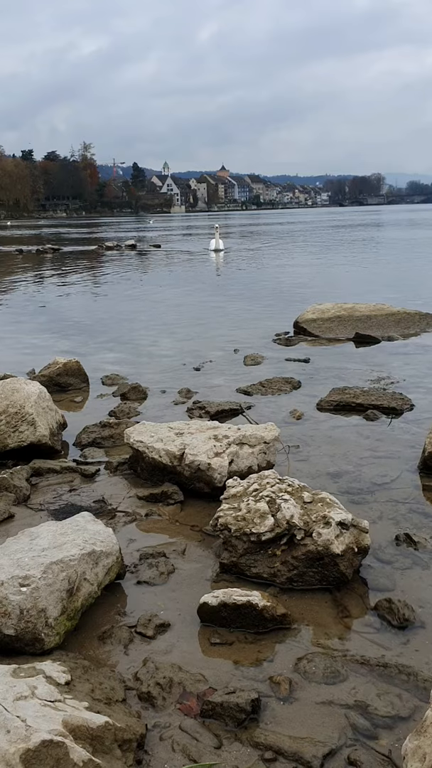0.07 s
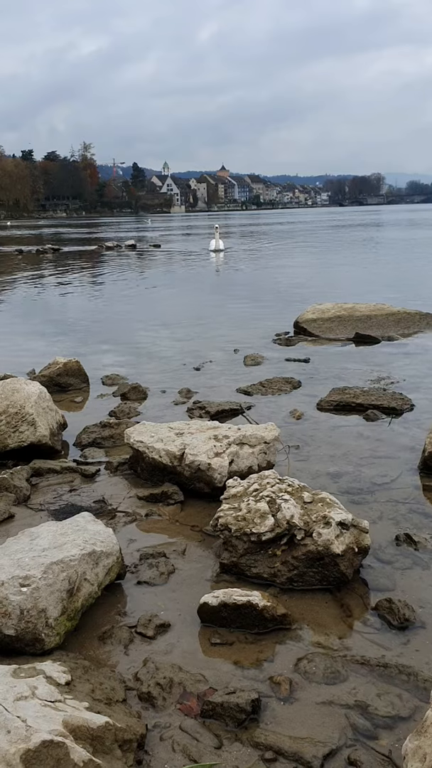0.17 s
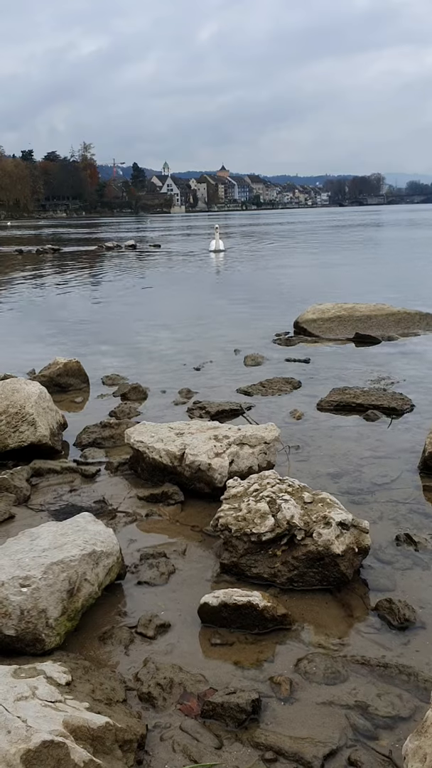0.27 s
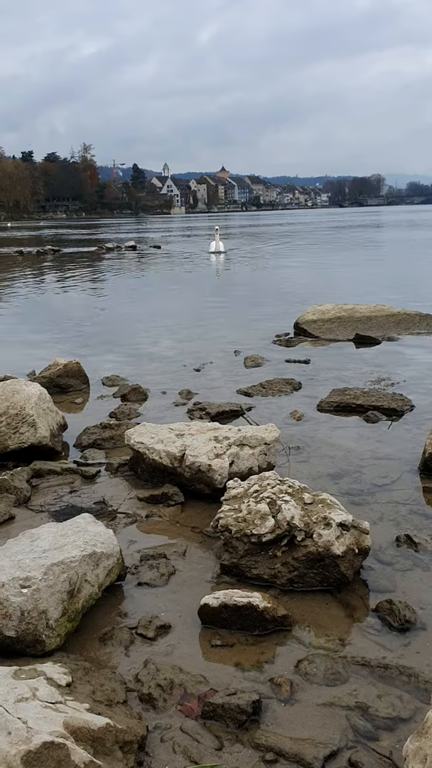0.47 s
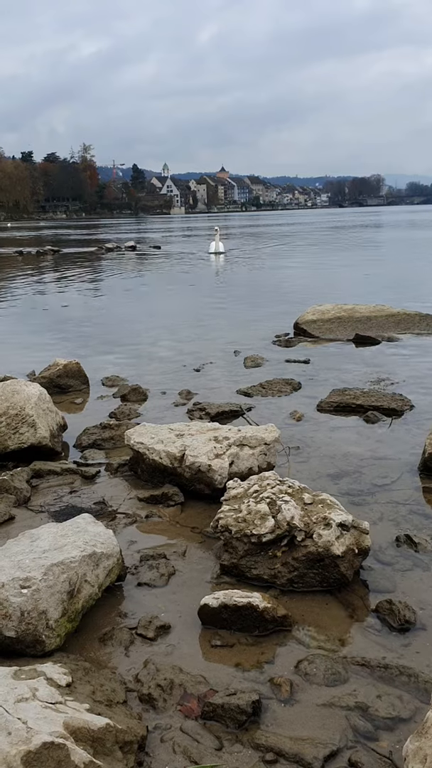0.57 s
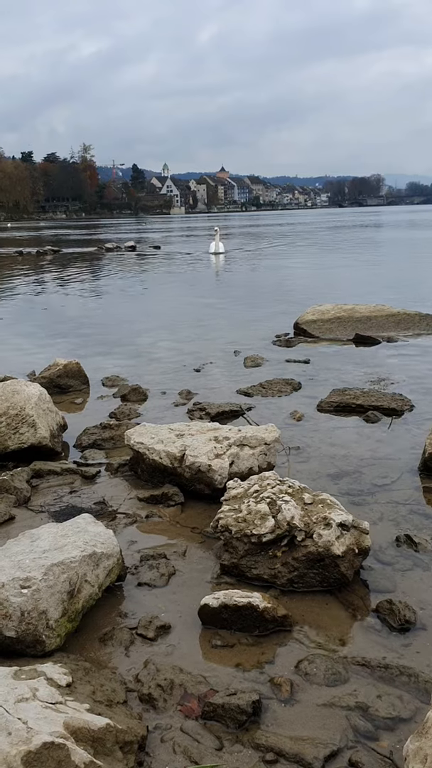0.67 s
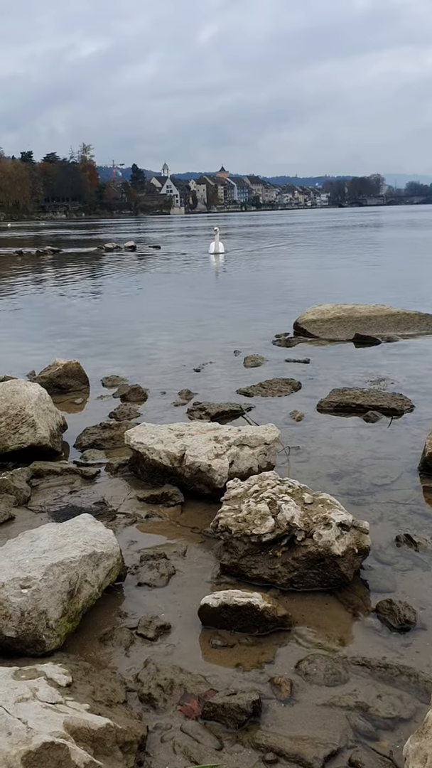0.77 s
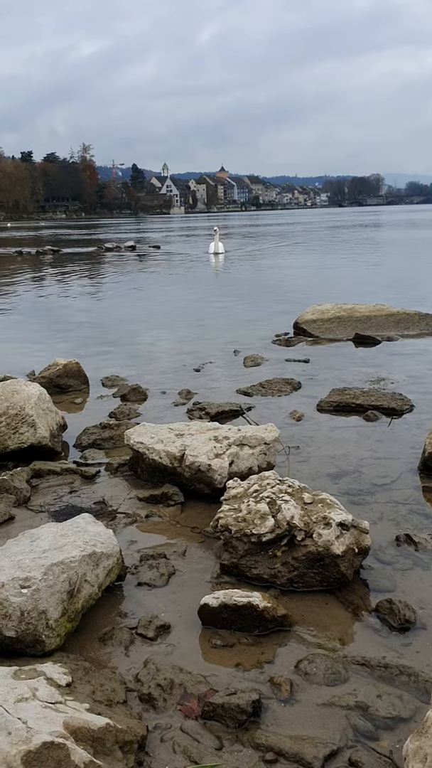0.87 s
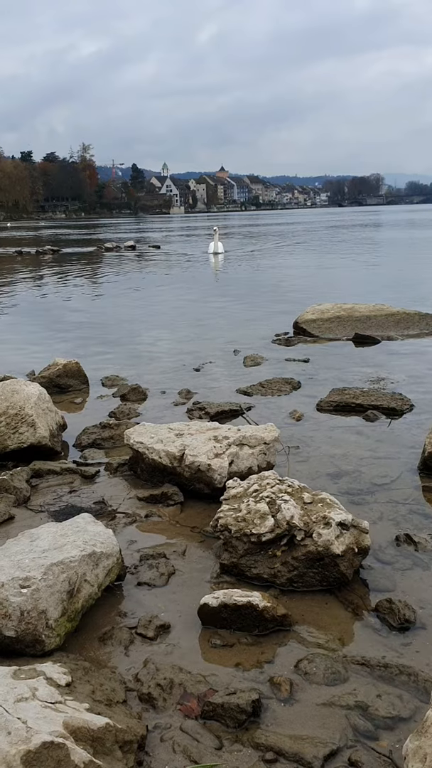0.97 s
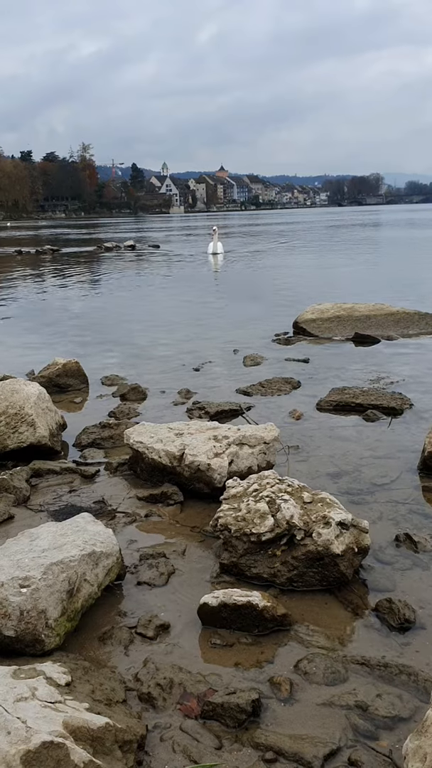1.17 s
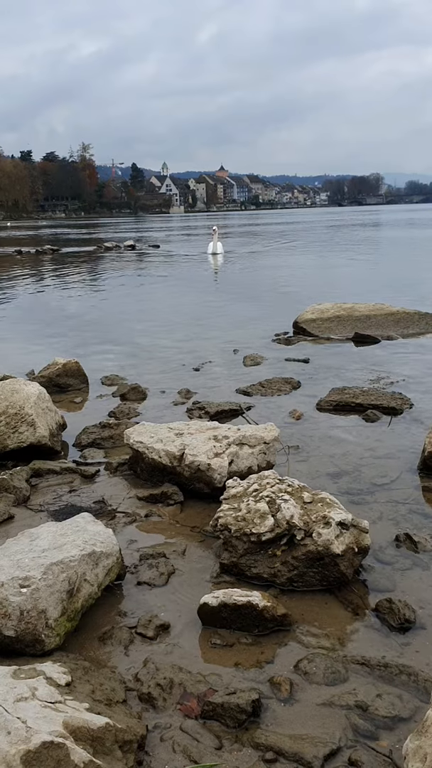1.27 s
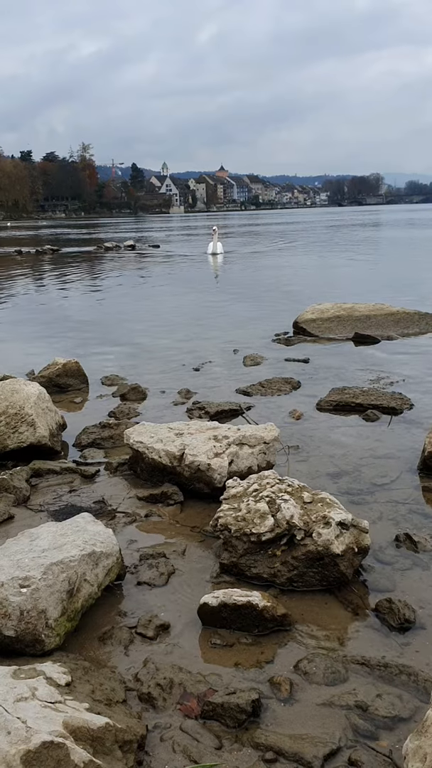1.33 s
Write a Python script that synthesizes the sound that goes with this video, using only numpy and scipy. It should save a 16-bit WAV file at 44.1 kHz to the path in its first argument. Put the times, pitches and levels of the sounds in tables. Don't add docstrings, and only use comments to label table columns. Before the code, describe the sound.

Two rough, raspy waterbird calls across quiet water, faint droplet ticks between them, far traffic humming.

```python
import sys
import numpy as np
from scipy import signal
from scipy.fft import rfft, irfft
from scipy.io import wavfile

SR = 44100
rng = np.random.default_rng(int(sys.argv[2]) if len(sys.argv) > 2 else 0)


def log_audio(samples):
    frames = np.atleast_2d(samples).T
    limited = np.clip(frames, -1, 1)
    pcm = np.round(limited * 32767).astype(np.int16)
    wavfile.write(sys.argv[1], SR, pcm)


def voltage_ratio(level):
    return 10 ** (np.asarray(level, float) / 20)


N = 172872
LEFT_RIGHT = np.array([[.5], [-.5]])


def rms_one(x):
    return x / np.sqrt(np.mean(x ** 2) + 1e-20)


def at_hz(points, hz):
    points = np.array(points)
    return np.interp(np.log(np.maximum(hz, 1)), np.log(points[:, 0]), points[:, 1])


def drift(rate_hz, size=N):
    r = np.exp(-2 * np.pi * rate_hz / SR)
    return rms_one(signal.lfilter([1], [1, -2 * r, r * r], rng.standard_normal(size + SR))[SR:])


def lag(x, delay_s):
    both = np.concatenate([x, x[::-1]])
    hz = np.fft.rfftfreq(2 * N, 1 / SR)
    return irfft(rfft(both) * np.exp(-2j * np.pi * hz * delay_s))[:N]


# (frequency [Hz], likeness [0-1])
PORT_LIKENESS = [(60, 1), (290, 0.97), (640, 0.9), (1410, .85), (3090, .5), (6800, 0.032)]
# (frequency [Hz], L-R [dB])
BACKGROUND_LEAN = [(60, 0), (130, 0.5), (290, 1), (640, 2.5), (1410, 6), (3090, 3), (6800, -0.5),
                   (15000, -0.5)]


def field(spectrum, patchy_db, lo_hz, hi_hz):
    hz = np.fft.rfftfreq(N, 1 / SR)
    alike = np.clip(at_hz(PORT_LIKENESS, hz), 0, 1)
    mid, side = rfft(rng.standard_normal((2, N))) * voltage_ratio(at_hz(spectrum, hz))
    pair = np.sqrt(1 + alike) * mid + np.sqrt(1 - alike) * side * np.array([[1], [-1]])
    pair = pair * voltage_ratio(LEFT_RIGHT * at_hz(BACKGROUND_LEAN, hz) * (hz < 3000))
    half_octave = 2 * np.log2(np.maximum(hz, 1))
    together = drift(1.9)
    out = 0
    for centre in np.arange(np.floor(2 * np.log2(lo_hz)), 2 * np.log2(hi_hz) + 1):
        share = np.cos(np.pi / 2 * np.clip(half_octave - centre, -1, 1)) ** 2
        share = share * (hz > lo_hz) * (hz < hi_hz)
        out = out + irfft(pair * share, N) * voltage_ratio(patchy_db * (1.1 * together + drift(10)))
    return rms_one(out)


def hum(hz, width_hz):
    r = np.exp(-np.pi * width_hz / SR)
    poles = [1, -2 * r * np.cos(2 * np.pi * hz / SR), r * r]
    once = signal.lfilter([1], poles, rng.standard_normal(N + SR))
    return rms_one(signal.lfilter([1], poles, once)[SR:])


# (frequency [Hz], density [dB per Hz])
RUMBLE_SPECTRUM = [(12, -40), (20, -13), (49, -2.5), (119, -0.5), (146, -5), (172, -2.5), (249, -6),
                   (279, -14), (420, -20), (550, -51), (920, -120)]
# (frequency [Hz], density [dB per Hz])
WASH_SPECTRUM = [(180, -30), (300, 0), (375, -5), (437, -5.5), (929, -14), (1060, -17.5), (1160, -20),
                 (2740, -40), (5000, -51), (6500, -85), (11000, -120)]
# (frequency [Hz], width [Hz], level [dB])
ENGINE_DRONES = [(52.5, 7.7, -61.5), (257.4, 20, -59), (354.5, 9.7, -70), (1176, 230, -76)]
# (time [s], level [dB])
DEEP_SWELLS = [
    (0.3, -56),
    (2.95, -55.5),
    (3.05, -46),
    (3.9, -49),
    (3.92, -34),
]
RUMBLE_DB, WASH_DB, PORT_LAG_S = -46.5, -63.5, .00009


def traffic_and_air():
    t = np.arange(N) / SR
    air = voltage_ratio(RUMBLE_DB) * field(RUMBLE_SPECTRUM, 0.91, 50, 420)
    air = air + voltage_ratio(WASH_DB) * field(WASH_SPECTRUM, 1.0, 420, 5000)
    drones = voltage_ratio(np.interp(t, *np.transpose(DEEP_SWELLS)) - 3) * hum(47, 21)
    for hz, width_hz, db in ENGINE_DRONES:
        drones = drones + voltage_ratio(db) * hum(hz, width_hz)
    left, right = air + drones * voltage_ratio(0.8 * LEFT_RIGHT)
    return np.array([left, lag(right, PORT_LAG_S)])


# (frequency [Hz], density [dB per Hz])
HISS_SPECTRUM = [(2060, -30), (3500, 0), (3910, -12.5), (5170, -4.5), (5820, -7), (7790, -4.5), (10800, -1),
                 (15400, -10.5)]


def port_hiss():
    return voltage_ratio(-94.5) * field(HISS_SPECTRUM, .3, 4000, 15500)


# (time [s], length [s], start [Hz], end [Hz], level [dB])
FAR_PIPES = [
    (.365, .07, 2340, 2140, -91),
    (.462, .048, 2290, 2265, -91),
]


def far_bird():
    t, out = np.arange(N) / SR, 0
    for start_s, length_s, from_hz, to_hz, db in FAR_PIPES:
        u = np.clip((t - start_s) / length_s, 0, 1)
        turn = 2 * np.pi * np.cumsum(from_hz + (to_hz - from_hz) * u) / SR
        out = out + voltage_ratio(db + 9 + 3 * drift(60)) * np.sin(np.pi * u) * np.sin(turn)
    return out


# (time [s], half pitch [Hz], level [dB], odd partials [dB], roughness [0-1])
CRY_VOICES = [
    [(.718, 1152, -70, 2.5, .15), (.742, 1221, -67.5, -2, 0.4), (.752, 1369, -53.5, -10.5, 0.38),
     (.80, 1377, -54, -15.5, 0.3), (.885, 1314, -55, -19.5, 0.1), (.92, 1281, -60.5, -6, 0.23),
     (1.04, 1267, -61, -24, 0.13), (1.16, 1220, -67, -38.5, 0.1), (1.215, 1135, -73.5, -37, .2)],
    [(3.002, 1126, -70.5, 0, 0.1), (3.035, 1270, -63.5, 1.5, .4), (3.055, 1343, -55, -20, 0.18),
     (3.11, 1323, -61, -9.5, 0.4), (3.185, 1290, -63, -6.5, 0.6), (3.205, 1274, -66.5, 4, .15),
     (3.295, 1246, -63.5, -5.5, 0.18), (3.33, 1255, -66.5, -26, 0.44), (3.45, 1202, -75, -38, 0.4)],
]
# (frequency [Hz], gain [dB])
CRY_THROATS = [
    [(1250, -1), (2600, 3.5), (3900, -4.5), (5350, -17), (7800, -27.5), (8900, -15.5), (10000, -51.5),
     (14000, -60.5)],
    [(1250, 1.5), (2600, 1), (3700, 2), (5300, -1), (7600, -11.5), (8900, -7.5), (10000, -26), (11000, -24)],
]
# (time [s], L-R of low partials [dB], L-R of high partials [dB])
CRY_SIDES = [
    [(.73, 0, -2), (.82, 7.5, -3), (.92, -7.5, -1), (1.1, 3, 4), (1.22, 4.5, -2.5)],
    [(3.0, -3, 16.5), (3.07, -5.5, 4), (3.15, 7, 5.5), (3.3, 8, 3), (3.47, 30, -1.5)],
]
# (frequency [Hz], gain [dB])
CRY_NOTCH = [(5500, -1), (5800, -13.5), (7000, -38.5), (7350, -0.5), (12500, 4), (15300, -10.5)]
WOBBLE, WOBBLE_HZ, JITTER_RAD, JITTER_HZ = .004, 50, .2, 600
CHAOS, CHAOS_HZ, FLUTTER, FLUTTER_HZ = 1.55, 220, .21, 100
RASP_DB, RASP_HZ = 11, 90
BREATH_DB, BREATH_FROM_HZ, BREATH_FLOOR, PUFF_DB = -10, 2800, .15, 7.5
BILL_OPENS_S, CLOSED_BOOM_DB, CLOSED_MUTE_DB = .038, 9, -5.5
DULLING = .2
ATTACK_S, RELEASE_S = .0073, .01


def cry(voice, throat, sides):
    s = np.transpose(voice)[0]
    start, size = int(s[0] * SR), int((s[-1] - s[0]) * SR)
    t = (start + np.arange(size)) / SR
    pitch_hz, db, odd_db, rough = [np.interp(t, s, column) for column in np.transpose(voice)[1:]]
    wobble = 1 + WOBBLE * drift(WOBBLE_HZ, size)
    turn = 2 * np.pi * np.cumsum(pitch_hz * wobble) / SR + JITTER_RAD * rough * drift(JITTER_HZ, size)
    closed = np.clip(2 - 2 * (t - s[0]) / BILL_OPENS_S, 0, 1)
    effort_db = db - db.max()

    high_pass = signal.butter(2, BREATH_FROM_HZ, "high", fs=SR, output="sos")
    breath = 2 * signal.sosfilt(high_pass, rng.standard_normal(size))
    breath = breath * voltage_ratio(BREATH_DB + PUFF_DB * closed) * (rough + BREATH_FLOOR + 0.37 * closed)
    low, high = 0, breath
    for k in range(1, 13):
        if k % 2:
            share, rate_hz = np.minimum(CHAOS * np.sqrt(rough), 1) ** 2, CHAOS_HZ
            gain_db = odd_db
        else:
            share, rate_hz = np.minimum(FLUTTER + rough / 2, 1), FLUTTER_HZ
            gain_db = 0
        if k == 1:
            gain_db = gain_db + CLOSED_BOOM_DB * closed
        else:
            gain_db = gain_db + DULLING * effort_db * (1 - closed) * np.log2(k / 2)
            gain_db = gain_db + CLOSED_MUTE_DB * closed * (k < 4)
        smear = drift(rate_hz, size) + 1j * drift(rate_hz, size)
        steady = np.sqrt(2 - 2 * share ** 2)
        partial = np.real((steady + share * smear) * np.exp(1j * k * turn)) * voltage_ratio(gain_db)
        if k < 3:
            low = low + partial
        else:
            high = high + partial

    at, low_db, high_db = np.transpose(sides)
    low = low * voltage_ratio(LEFT_RIGHT * np.interp(t, at, low_db))
    high = high * voltage_ratio(LEFT_RIGHT * np.interp(t, at, high_db))
    rasp_db = RASP_DB * rough * (1 - closed) * np.maximum(drift(RASP_HZ, size), 0) ** 2
    edges = np.clip(np.minimum((t - s[0]) / ATTACK_S, (s[-1] - t) / RELEASE_S), 0, 1)
    out = np.zeros((2, N))
    out[:, start:start + size] = voltage_ratio(db - rasp_db) * edges * (low + high)
    hz = np.fft.rfftfreq(N, 1 / SR)
    return irfft(rfft(out) * voltage_ratio(at_hz(throat, hz) + at_hz(CRY_NOTCH, hz)), N)


# (frequency [Hz], left lead [rad], extra L-R [dB])
PORT_DIFFERENCE = [(300, .2, 1), (2610, 1.48, 1.5), (5700, 2.2, -2.5), (7500, 4.4, -3.5),
                   (9000, 5.04, -9.5), (13150, 8.3, -8)]


def at_ports(bird):
    hz, table = np.fft.rfftfreq(N, 1 / SR), np.array(PORT_DIFFERENCE)
    lead = np.exp(1j * LEFT_RIGHT * at_hz(table[:, :2], hz))
    lean = voltage_ratio(LEFT_RIGHT * at_hz(table[:, ::2], hz))
    return irfft(rfft(bird) * lead * lean, N)


SHORE_T60_S, SHORE_DB, SHORE_GAP_S, SHORE_CUT_HZ = .33, -15, .012, 3500


def shore(x):
    t = np.arange(SR) / SR
    tail = rng.standard_normal((2, SR)) * voltage_ratio(-60 * t / SHORE_T60_S) * (t > SHORE_GAP_S)
    tail = signal.sosfilt(signal.butter(2, SHORE_CUT_HZ, fs=SR, output="sos"), tail)
    tail = tail / np.sqrt(np.sum(tail ** 2, axis=1, keepdims=True))
    return voltage_ratio(SHORE_DB) * signal.fftconvolve(x, tail, axes=1)[:, :N]


# (time [s], peak [dB])
DROPLET_TICKS = [
    (1.3297, -78),
    (1.3564, -93),
    (1.677, -86.5),
    (1.7134, -81),
    (1.8497, -85),
    (1.9404, -78),
    (1.958, -81),
    (2.0024, -93),
]
TICK_HZ, TICK_T60_S, TICK_DB = 8600, .0066, 2


def droplets():
    clicks = np.zeros(N) + 1e-18
    for s, db in DROPLET_TICKS:
        clicks[int(s * SR)] = voltage_ratio(db + TICK_DB)
    r, w = voltage_ratio(-60 / (TICK_T60_S * SR)), 2 * np.pi * TICK_HZ / SR
    ring = signal.lfilter([0, np.sin(w)], [1, -2 * r * np.cos(w), r * r], clicks)
    return ring * voltage_ratio(-5 * LEFT_RIGHT)


def scene():
    background = traffic_and_air() + port_hiss()
    bird = sum(cry(*parts) for parts in zip(CRY_VOICES, CRY_THROATS, CRY_SIDES))
    return background + far_bird() + at_ports(bird) + shore(bird) + droplets()


def band_limit(x):
    return signal.sosfilt(signal.butter(12, 15570, fs=SR, output="sos"), x)


FADE_START_S, FADE_S, FADE_POWER, END_S = .2, .093, .66, .005


def record(dry):
    t = np.arange(N) / SR
    fade_in = np.clip((t - FADE_START_S) / FADE_S, 0, 1) ** FADE_POWER
    fade_out = np.sin(np.pi / 2 * np.clip((t[-1] - t) / END_S, 0, 1))
    return band_limit(dry * fade_in * fade_out)


dry = scene()
out = record(dry)
log_audio(out)
```